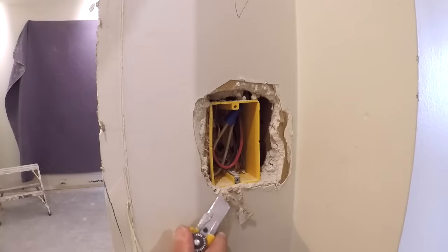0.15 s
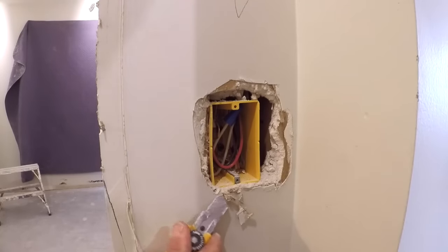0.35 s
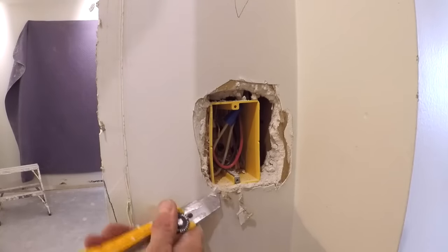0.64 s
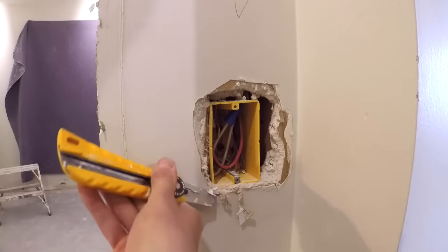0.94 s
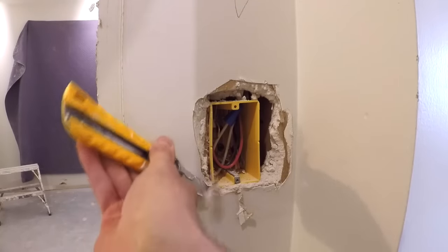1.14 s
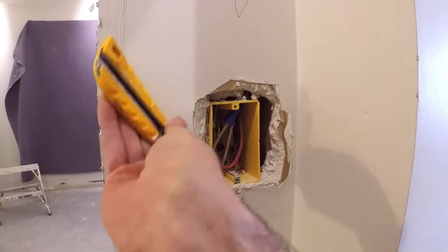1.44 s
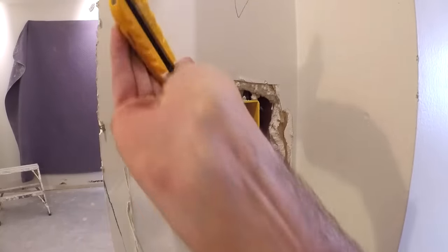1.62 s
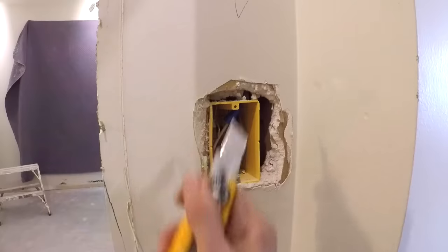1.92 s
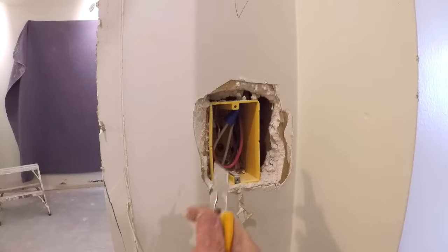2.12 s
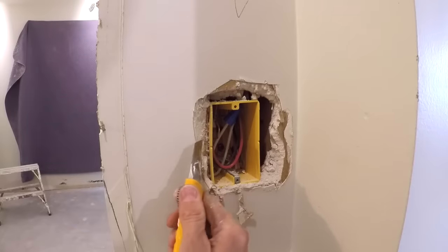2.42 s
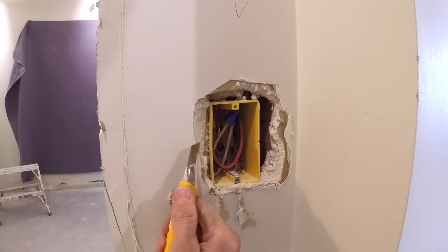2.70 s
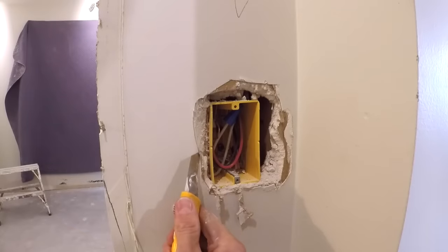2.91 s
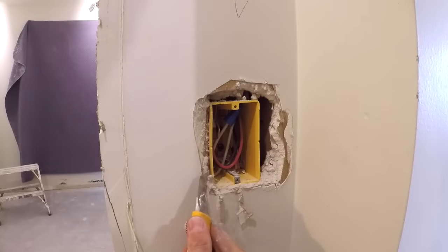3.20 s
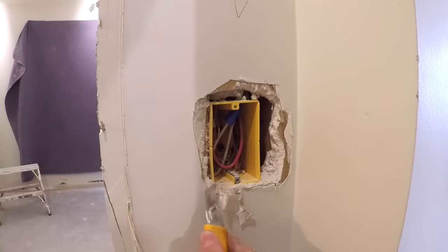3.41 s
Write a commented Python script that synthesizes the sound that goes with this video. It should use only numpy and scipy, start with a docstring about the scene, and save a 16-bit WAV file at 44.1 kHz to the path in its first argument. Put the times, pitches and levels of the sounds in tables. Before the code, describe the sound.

A utility knife cuts crumbly plasterboard, close-miked in a bare, lightly reverberant room with quiet room tone. Dry crunches come at 0 and 0.45 seconds, a soft hand knock at 0.8, a double crunch near 1.1 and a bright steel scrape around 1.5. Faint handle rattles and near-quiet follow until 2.8; gritty cuts at 3.1, then the loudest sound, a sharp snap at 3.36, with a tiny tick at 3.5.

```python
"""A bare room, close to a plasterboard wall: a utility knife trims the edge of a hole.
Each short cut is a dense run of tiny random fractures, filtered into crushed gypsum and torn paper,
that also rings the board and the panel. Scrapes drive the steel blade's modes, light skims hiss and
one squeak is a wavering tone. The knife rattles in the hand and the hand knocks softly.
Near the end a piece snaps off: a click, a crack and a quickly dying burst of breaks."""
import sys
import numpy as np
from scipy import signal
from scipy.fft import rfft, irfft
from scipy.io import wavfile
from scipy.ndimage import uniform_filter1d

SR = 44100
rng = np.random.default_rng(int(sys.argv[2]) if len(sys.argv) > 2 else 0)


def dump_mix(stems):
    """Bounce the given channels to the path in sys.argv[1] as a 16-bit WAV at rate SR."""
    frames = np.atleast_2d(stems).T  # one column per channel
    limited = np.clip(frames, -1, 1)  # hard clip at full scale
    pcm = np.round(limited * 32767).astype(np.int16)
    wavfile.write(sys.argv[1], SR, pcm)


N = 156555
TIME = np.arange(N) / SR


def from_db(db):
    """Decibels to gain."""
    return 10 ** (np.asarray(db) / 20)


def rms_one(x):
    """Scale to an rms of 1."""
    return x / np.sqrt(np.mean(x ** 2) + 1e-20)


def at_hz(table, hz, column=1):
    """Read a column of a table on a log-frequency axis."""
    rows = np.array(table)
    return np.interp(np.log(hz + 1e-9), np.log(rows[:, 0]), rows[:, column])


def through(x, response):
    """Pass a sound through an impulse response scaled to unit energy."""
    return signal.fftconvolve(x, response / np.linalg.norm(response))[:N]


def colour(x, spectrum, size=8192):
    """Causal (minimum-phase) filter with the given spectral shape."""
    log_gain = np.log(from_db(at_hz(spectrum, np.fft.rfftfreq(size, 1 / SR))))
    # Folding the cepstrum onto positive times gives the minimum phase
    cepstrum = irfft(log_gain)
    cepstrum[1:size // 2] *= 2
    cepstrum[size // 2 + 1:] = 0
    return through(x, irfft(np.exp(rfft(cepstrum))))


def ring(x, modes):
    """Drive a body's decaying modes; each level sets that mode's share of the energy."""
    t = TIME[:SR // 2]
    response = np.zeros(len(t))
    for k, (hz, db, t60) in enumerate(modes):
        decay = from_db(db - 60 * t / t60) / np.sqrt(t60)
        response += (-1) ** k * decay * np.sin(2 * np.pi * hz * t)
    return through(x, response)


def filtered(x, limits_hz, kind, order=2):
    """Butterworth filter of the given kind."""
    return signal.sosfilt(signal.butter(order, limits_hz, kind, fs=SR, output="sos"), x)


def drift(limit_hz):
    """Random motion slower than the limit, with a spread of 1."""
    settled = filtered(rng.standard_normal(N + SR), limit_hz, "low")[SR:]
    return rms_one(settled)


def force(rows, column=4):
    """Exponential rise, hold and fall of every row, at the level in the given column."""
    power = np.zeros(N)
    for row in rows:
        start, rise, hold, fall = row[:4]
        before = np.minimum(TIME - start, 0) / rise
        after = np.maximum(TIME - start - hold, 0) / fall
        power += (from_db(row[column]) * np.exp(before - after)) ** 2
    return np.sqrt(power)


GRAINS_PER_S, GRAIN_SPREAD_DB = 9000, 3
JUDDER_DB, JUDDER_HZ = 0.6, 49


def fractures():
    """Tiny breaks of uneven size, bunched as the blade sticks and slips."""
    size_db = GRAIN_SPREAD_DB * np.minimum(rng.exponential(1, N), 4)
    sizes = from_db(size_db) * rng.choice([-1, 1], N)
    grains = sizes * (rng.random(N) < GRAINS_PER_S / SR)
    # Even out the level over some 7 ms, then add the judder
    local_power = np.abs(uniform_filter1d(grains ** 2, size=300))
    grains = grains / np.sqrt(local_power + 1e-6)
    return rms_one(grains * from_db(JUDDER_DB * drift(JUDDER_HZ)))


# Room tone: hz, density_db (relative, per Hz)
ROOM_TONE = [(20, 6.5), (45, -4), (100, -9.5), (250, -11), (500, -17.5), (1000, -18.5), (2500, -25),
             (6000, -29), (11000, -32), (16000, -34)]
ROOM_TONE_DB = -61.5
SWAY_DB, SWAY_HZ = -53, 4.24


def background():
    """Quiet coloured noise as room tone and a very slow sway of air on the microphone."""
    tone = from_db(ROOM_TONE_DB) * colour(rng.standard_normal(N), ROOM_TONE)
    sway = from_db(SWAY_DB) * drift(SWAY_HZ)
    return tone + sway


# The room's tail: hz, t60_s, level_db (against the direct sound)
ROOM_TAIL = [(100, 0.37, -8.5), (297, 0.45, -4.5), (790, 0.53, -2.5), (1740, 0.55, -4.5),
             (4840, 0.49, -9.5), (9000, 0.34, -6.5), (15200, .2, -9)]
TAIL_BUILD_S = 0.01
NEAR_WALLS_DB, NEAR_WALLS_PEAK_S, NEAR_WALLS_LOW_HZ = -5, 0.007, 466


def room(x):
    """Direct sound, quick echoes off the nearest walls and a tail that dies band by band."""
    t = TIME[:SR * 2 // 3]
    edges = 60 * 2 ** (np.arange(13) * 2 / 3)   # bands of two thirds of an octave
    white = rng.standard_normal((2, len(t)))
    response = np.zeros(len(t))
    for k, (low, high) in enumerate(zip(edges, edges[1:])):
        hz = np.sqrt(low * high)
        band = filtered(white[k % 2], [low, high], "band")
        decay = from_db(-60 * t / at_hz(ROOM_TAIL, hz, column=1))
        tail = band * decay * np.minimum(t / TAIL_BUILD_S, 1) ** 2
        level = from_db(at_hz(ROOM_TAIL, hz, column=2)) * np.sqrt(2 * (high - low) / SR)
        response += level * tail / np.linalg.norm(tail)
    near = rng.standard_normal(len(t)) * t * np.exp(-t / NEAR_WALLS_PEAK_S)
    near = filtered(near, NEAR_WALLS_LOW_HZ, "high")
    response += from_db(NEAR_WALLS_DB) * near / np.linalg.norm(near)
    return x + signal.fftconvolve(x, response)[:N]


# Soft knocks of the hand, for rumble and thuds:
# start_s (of full force), rise_s, hold_s, fall_s, thud_db, rumble_db
KNOCKS = [(.46, 0.014, .08, 0.016, -53.5, -59), (.818, .0015, 0.013, 0.0045, -48.5, -47.5),
          (.838, 0.0034, 0.006, 0.014, -55.5, -49), (.864, .002, .003, .012, -62.5, -57),
          (.905, .015, 0.011, .012, -61.5, -62), (1.533, 0.018, 0.025, 0.018, -53, -46.5),
          (1.65, 0.053, 0.069, 0.15, -80, -66), (2.42, .03, 0.012, 0.027, -67, -61),
          (3.1, 0.021, 0.068, 0.053, -68, -63), (3.372, .008, .015, 0.036, -68, -56)]
# Jogged microphone: hz, density_db (relative, per Hz)
RUMBLE = [(10, -13), (28, 3), (42, 7), (58, -9), (85, -7), (140, -21.5), (400, -37), (2000, -75)]


def rumble():
    """The hand's movements jog the microphone directly, as low-pitched noise."""
    return colour(fractures() * force(KNOCKS, column=5), RUMBLE)


# Thud of the hand: hz, density_db (relative, per Hz)
THUD = [(40, -4.5), (85, 5), (120, -4.5), (165, 1.5), (230, -1), (330, 2), (500, -4), (660, -14),
        (1200, -28), (4000, -48)]


def knocks():
    """Dull thuds from the moving hand: fractures filtered down to the lows."""
    return colour(fractures() * force(KNOCKS, column=4), THUD)


# Gritty treble of gypsum and paper: hz, density_db (relative, per Hz)
GRIT = [(500, 4), (2000, -11), (3300, 5), (4500, 3), (6000, 1), (7200, -4.5), (8700, -4.5), (10800, -14),
        (13500, -11.5), (16000, -30.5)]


def grit(x):
    """Colour fractures as bright, gritty treble."""
    return colour(x, GRIT)


# The knife shifts in the hand: start_s (of full force), rise_s, hold_s, fall_s, tick_db, ring_db
RATTLES = [(.496, .004, 0.011, 0.0068, -80, -61), (.53, .001, .001, .003, -80, -71),
           (.894, .001, 0.00091, 0.0021, -66, -76), (1.018, 0.00091, .002, 0.0048, -64.5, -85),
           (1.672, 0.0096, 0.015, .005, -63.5, -61.5), (1.892, .004, 0.0049, 0.01, -64, -68),
           (1.95, 0.0043, 0.0051, 0.0073, -68, -79), (2.094, 0.0027, 0.0065, 0.0075, -67, -70),
           (2.134, 0.0011, .002, .005, -78, -73), (3.044, 0.0012, 0.0017, 0.0026, -55, -71),
           (3.493, .001, .001, 0.0014, -51.5, -66)]
# Modes of the handle: pitch_hz, level_db (relative), t60_s
HANDLE = [(3500, -3, 0.0055), (4500, -3.5, 0.011), (5760, -5, 0.014), (6330, -0.5, 0.0053),
          (8000, -7, 0.0071)]


def handle():
    """The blade's slider ticks and rattles, ringing the handle's short modes."""
    ticks = fractures() * force(RATTLES, column=4)
    rattle = fractures() * force(RATTLES, column=5)
    return grit(ticks) + ring(rattle, HANDLE)


# The blade skims over the paper face: start_s (of full force), rise_s, hold_s, fall_s, level_db
SKIMS = [(.695, 0.038, 0.016, 0.013, -74), (.738, 0.0067, 0.013, 0.017, -67.5), (.8, .02, 0.013, .01, -74),
         (1.34, .04, 0.14, .02, -72.5), (2.098, 0.0047, 0.0072, .035, -67), (2.75, 0.013, 0.018, .02, -81),
         (2.845, 0.029, 0.021, 0.014, -66), (2.859, .001, .003, .002, -61),
         (3.091, 0.0011, 0.0022, .002, -50), (3.295, .015, 0.086, .01, -70)]
# Hiss of the skimming: hz, density_db (relative, per Hz)
SKIM = [(1000, -23), (3000, -33), (5500, -2.5), (7000, -7.5), (8300, 1.5), (9300, -2.5), (10600, -13),
        (13500, -10), (16000, -22)]


def skims():
    """With little pressure only a fine, high hiss is left."""
    return colour(fractures() * force(SKIMS), SKIM)


# The blade squeaks in the paper: start_s (of full force), rise_s, hold_s, fall_s, level_db
SQUEAK = [(.596, 0.017, .028, .005, -64)]
SQUEAK_HZ, SQUEAK_WAVER = 1700, 0.0224   # the waver is a fraction of the pitch


def squeak():
    """For a moment the sticking and slipping turns regular and gives a wavering tone."""
    hz = SQUEAK_HZ * (1 + SQUEAK_WAVER * drift(JUDDER_HZ))
    tone = np.sin(2 * np.pi * np.cumsum(hz) / SR)
    return force(SQUEAK) * rms_one(tone)


# The blade scrapes: start_s (of full force), rise_s, hold_s, fall_s, level_db
SCRAPES = [(1.392, 0.079, .01, .01, -69.5), (1.415, 0.012, 0.053, .008, -60.5),
           (1.467, 0.0041, 0.0073, .01, -43), (1.488, 0.0025, 0.0014, 0.0023, -39),
           (1.537, .006, 0.0059, 0.0042, -59)]
# Modes of the steel blade: pitch_hz, level_db (relative), t60_s
BLADE = [(2630, -3.5, 0.0091), (3870, 5, 0.013), (4340, 1, 0.0089), (4800, -4.5, 0.012),
         (5570, -10, 0.0059), (5900, -15, 0.0083), (8360, -7.5, .008), (9450, -9, 0.012)]
BLADE_GRIT_DB = -2   # against the scrape


def blade():
    """Scraping rings the steel blade's modes under a layer of grit."""
    scrape = fractures() * force(SCRAPES)
    return ring(scrape, BLADE) + grit(from_db(BLADE_GRIT_DB) * scrape)


# Modes of the board around the hole: pitch_hz, level_db (relative), t60_s
BOARD = [(238.5, -11, 0.3), (315.8, 1.5, 0.13), (359, -3, 0.12), (506.7, 2, 0.084), (610.5, -6, 0.082),
         (749.4, -6, 0.18)]


def board(x):
    """The board around the hole rings in its own modes."""
    return ring(x, BOARD)


# Modes of the whole wall panel: pitch_hz, level_db (relative), t60_s
PANEL = [(85.7, -4.5, 0.17), (167.3, 3, 0.14)]


def panel(x):
    """The whole wall panel booms in two low modes."""
    return ring(x, PANEL)


# Breaking gypsum: hz, density_db (relative, per Hz)
SNAP = [(100, -29), (300, -4.5), (600, -3), (850, -9), (1250, 0), (1600, -2), (2100, -8), (2500, -12),
        (3800, -14.5), (7000, -21), (15000, -40)]
# Modes of the breaking piece: pitch_hz, level_db (relative), t60_s
PIECE = [(1250, -6, 0.051), (1380, -2, 0.033), (1700, 3.5, 0.031), (2027, 6.5, 0.028), (4230, -5, 0.013),
         (5023, -3.5, 0.026), (6240, -15, 0.0078), (8530, -2, 0.0064)]
SNAP_S, SNAP_FALL_S, CRACK_FALL_S = 3.3592, 0.014, 0.004
FIRST_BREAK_DB = -8   # the single click that opens the crack
SNAP_DB, CRACK_DB, PIECE_DB = -26, -29.5, -26
SNAP_BOARD_DB, SNAP_PANEL_DB = -31, -38.5


def snap():
    """A sharp crack rings the loose piece, breaks die away and the wall springs back."""
    age = np.maximum(TIME - SNAP_S, 0)
    breaking = (TIME >= SNAP_S) * np.exp(-age / SNAP_FALL_S)
    crack = (TIME >= SNAP_S) * np.exp(-age / CRACK_FALL_S)
    click = from_db(FIRST_BREAK_DB) * (np.arange(N) == int(SNAP_S * SR))
    crumbs = colour(click + from_db(SNAP_DB) * fractures() * breaking, SNAP)
    crackle = from_db(CRACK_DB) * grit(fractures() * crack)
    piece = from_db(PIECE_DB) * ring(fractures() * crack, PIECE)
    wall = from_db(SNAP_BOARD_DB) * board(fractures() * breaking)
    boom = from_db(SNAP_PANEL_DB) * panel(fractures() * breaking)
    return crumbs + crackle + piece + wall + boom


# Cuts: start_s (of full force), rise_s, hold_s, fall_s, crunch_db, grit_db, board_db, panel_db
CUTS = [(.019, 0.0053, 0.015, 0.018, -44.5, -47, -47.5, -46),
        (.245, 0.06, 0.022, 0.012, -65, -67.5, -67, -80), (.432, 0.023, 0.0037, .005, -62, -63.5, -74, -66),
        (.447, 0.0021, 0.0011, 0.0014, -48, -34.5, -51, -43),
        (.454, 0.0027, 0.0076, 0.0064, -42, -51.5, -50.5, -52.5),
        (.509, 0.0068, 0.0024, 0.019, -57.5, -57, -53, -75),
        (.605, 0.023, 0.027, 0.017, -67.5, -70.5, -77, -71.5),
        (.68, 0.038, 0.019, 0.011, -59.5, -62.5, -64, -89),
        (.722, .01, 0.019, .015, -65.5, -64.5, -63.5, -85),
        (.825, 0.022, 0.021, 0.029, -71.5, -73.5, -69, -55),
        (1.07, 0.0071, 0.013, .005, -47.5, -47, -75, -73),
        (1.083, 0.0036, 0.0084, 0.0093, -42, -42, -75, -67),
        (1.39, 0.05, 0.038, 0.017, -64.5, -66, -70, -76),
        (1.475, 0.026, 0.069, 0.015, -54, -55, -62, -59.5),
        (1.612, 0.0058, 0.007, .008, -58.5, -58.5, -72, -73),
        (2.57, 0.006, 0.0035, 0.0057, -68, -71.5, -76, -78),
        (2.853, 0.048, 0.031, .018, -62, -65, -68, -72.5),
        (3.058, 0.011, 0.022, 0.0077, -50, -50.5, -48, -66.5),
        (3.099, 0.0055, 0.0093, 0.015, -44, -45.5, -43, -53),
        (3.295, 0.029, 0.072, 0.013, -62.5, -64, -58.5, -70.5)]
# Crushed gypsum and torn paper: hz, density_db (relative, per Hz)
CRUNCH = [(100, -7.5), (350, 3), (700, 7), (1050, 1), (1500, 3), (2200, 3.5), (3200, 8), (5000, -30),
          (15000, -47.5)]


def cuts():
    """The blade crunches through gypsum and paper, rings the board and shakes the whole panel."""
    grains = fractures()   # crunch and grit share the same breaks
    crunch = colour(grains * force(CUTS, column=4), CRUNCH)
    treble = grit(grains * force(CUTS, column=5))
    wall = board(fractures() * force(CUTS, column=6))
    boom = panel(fractures() * force(CUTS, column=7))
    return crunch + treble + wall + boom


WORK_DB = 0.5   # gain on all the work, over its own levels


def scene():
    """The work at the wall, heard in the room, over the background."""
    sources = knocks() + handle() + skims() + squeak() + blade() + snap() + cuts()
    work = room(sources) + rumble()
    return (from_db(WORK_DB) * work + background())[None]


CUTOFF_HZ = 15400


def record(dry):
    """A steep elliptic low-pass cuts the top."""
    return signal.sosfilt(signal.ellip(10, .2, 70, CUTOFF_HZ, fs=SR, output="sos"), dry)


dry = scene()
out = record(dry)
dump_mix(out)
```